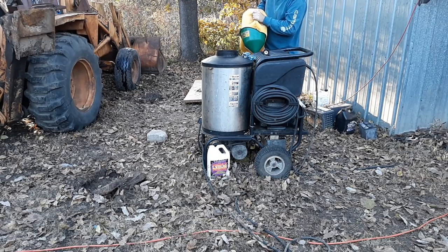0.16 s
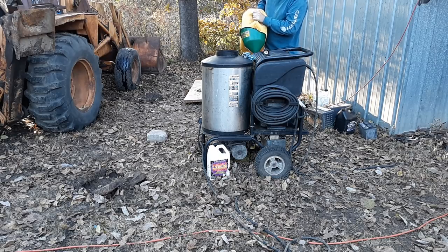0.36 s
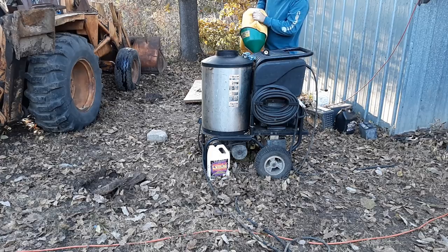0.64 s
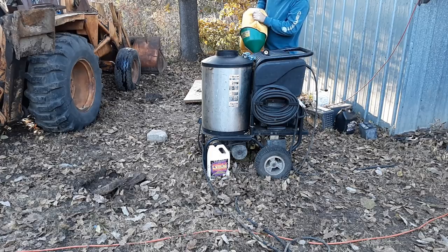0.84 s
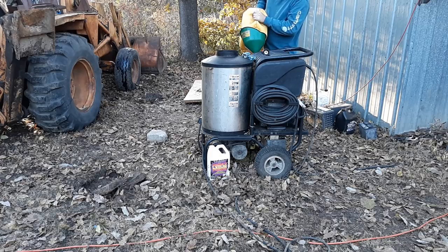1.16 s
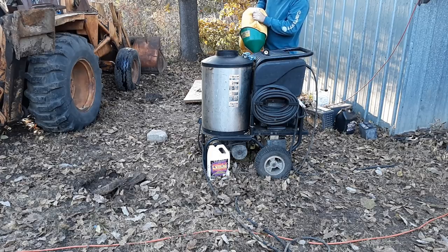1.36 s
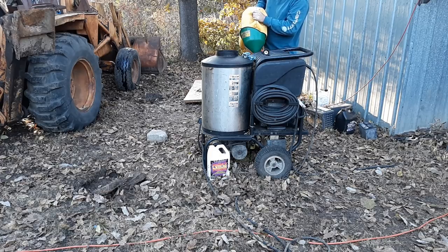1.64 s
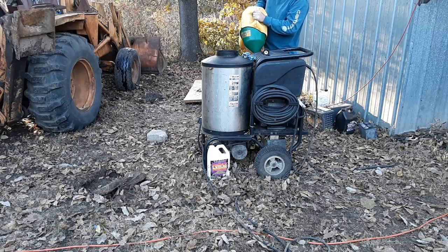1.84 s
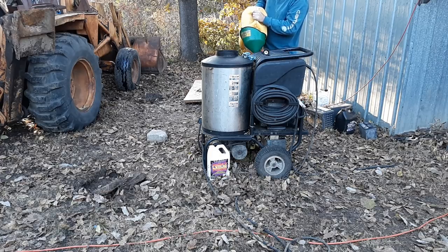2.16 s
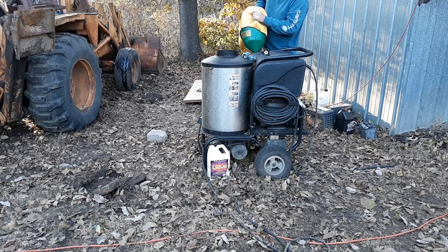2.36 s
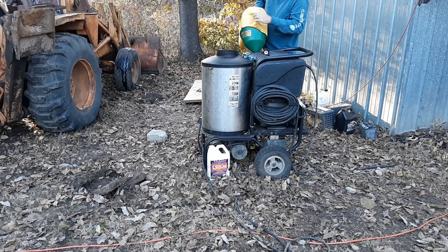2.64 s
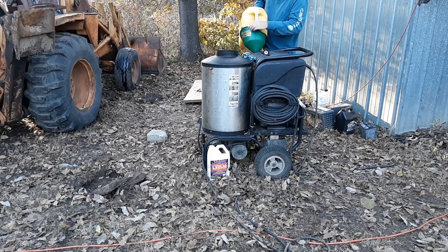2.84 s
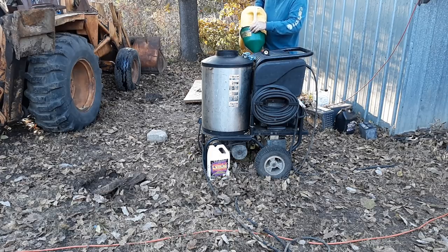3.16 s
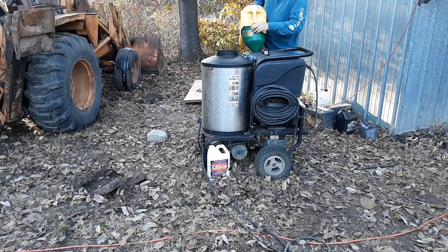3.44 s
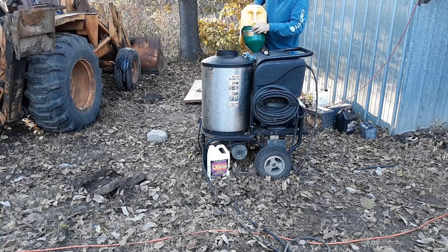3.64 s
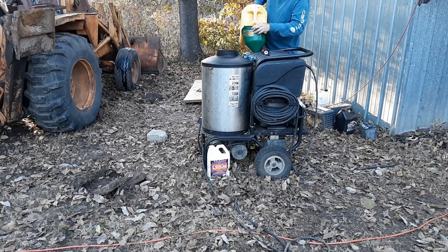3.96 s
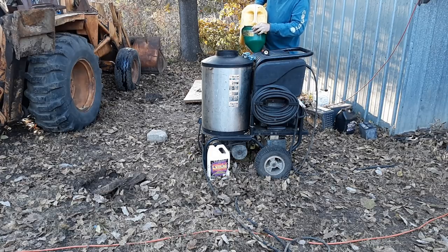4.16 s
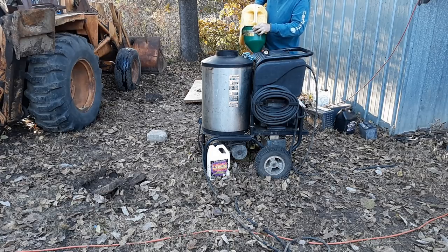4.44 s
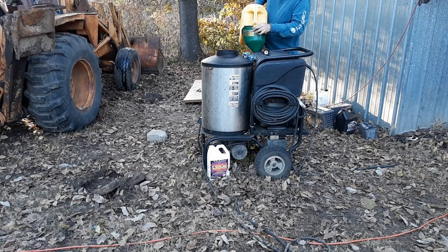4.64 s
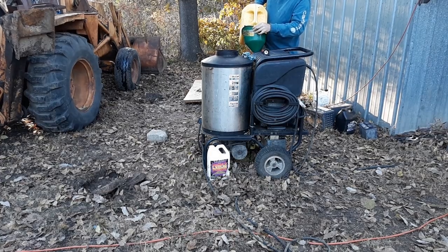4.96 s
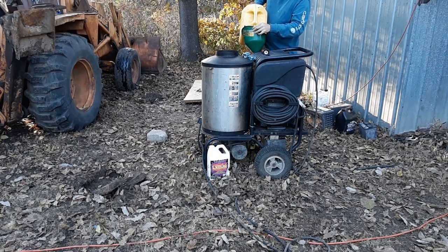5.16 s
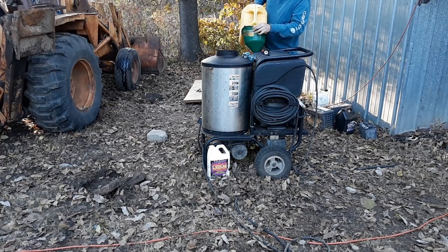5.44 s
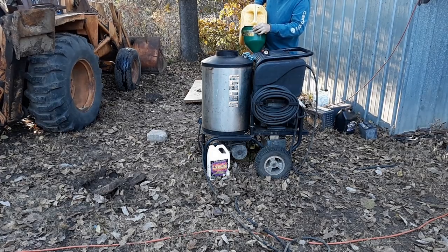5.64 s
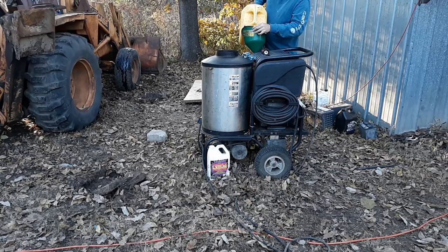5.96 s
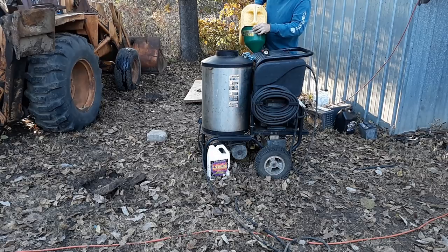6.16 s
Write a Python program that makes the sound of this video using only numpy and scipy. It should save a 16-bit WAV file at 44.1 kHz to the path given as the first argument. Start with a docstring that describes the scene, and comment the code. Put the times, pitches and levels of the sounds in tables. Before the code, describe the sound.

A few metres away in a quiet yard, liquid pours from a plastic jug through a funnel into a machine's tank. Fizzy, pulsing splashes ring the funnel, at first light, then joined by steady hollow glugs several times a second. Around the middle the jug's wall judders and pops; afterwards the glugs are deeper and louder. Occasional ticks, faint low rumble and hiss beneath.

```python
"""Pouring fuel through a funnel

Fuel is poured from a plastic jug through a funnel into a machine's tank, a few metres away in a yard.
The stream is random droplet hits that splash in surges and ring the funnel; bubbles are short rising notes.
Air gulps back into the jug several times a second, each gulp a short hollow glug that rings and rises.
Halfway the jug's wall judders and pops: short pushes set its own notes ringing. Drops tick in the funnel
as short bursts of ringing noise. A faint outdoor rumble and microphone hiss, both shaped noise, lie below."""
import sys
import numpy as np
from scipy import signal
from scipy.fft import rfft, irfft
from scipy.io import wavfile
from scipy.ndimage import map_coordinates

SR = 44100
rng = np.random.default_rng(int(sys.argv[2]) if len(sys.argv) > 2 else 0)


def to_wav(sig):
    """Store sig (one row per channel, or 1-D mono) as 16-bit WAV at the path in sys.argv[1].

    Samples outside -1..1 are clipped; the rate is SR.
    """
    pcm = np.clip(np.atleast_2d(sig), -1, 1) * 32767
    pcm = np.round(pcm).astype(np.int16)
    wavfile.write(sys.argv[1], SR, pcm.T)  # frames by channels


N = 277389

# tone colour of the outdoor rumble: (frequency [Hz], level [dB])
RUMBLE_SPECTRUM = [(20, -45), (40, -12), (65, -0.5), (100, 5), (128, 2), (165, -4.5), (230, -15.5),
                   (400, -26.5), (900, -29)]
# loudness of the outdoor rumble: (time [s], level [dB])
RUMBLE_LEVEL = [(0, -61), (.8, -57.5), (1.6, -54.5), (3, -53), (6.29, -53)]
# tone colour of the steady microphone hiss: (frequency [Hz], level [dB])
HISS_SPECTRUM = [(200, 1.5), (500, 1), (1000, -7.5), (3000, -16.5), (7000, -7), (8500, -29), (15500, -7)]
# drops and ticks on the funnel: (time [s], peak level [dB], pitch [Hz])
FUNNEL_TICKS = [(0.0453, -41.5, 1205), (.046, -37.5, 1600), (.306, -40.5, 4280), (0.427, -41, 3100),
                (1.015, -42, 1200), (2.573, -37, 2290), (2.594, -22.5, 4090), (3.374, -39, 1890),
                (3.727, -36, 3840), (3.801, -42, 3200), (3.964, -37, 6050), (5.34, -23, 5530),
                (5.353, -29, 1570), (5.552, -36, 1570)]
# bends of the jug's wall: (time [s], strength [dB], contact time [s])
WALL_FLEXES = [(3.077, -21, 0.0014), (3.0911, -18.5, 0.0015), (3.1053, -25.5, 0.001), (3.119, -40, 0.0014),
               (3.1321, -20, 0.0011), (3.147, -38, 0.0012), (3.3532, -20, 0.00058), (3.355, -20.5, 0.00024),
               (3.3772, -28.5, 0.00073)]
# the jug wall's own notes: (frequency [Hz], level [dB], time to fall 60 dB [s])
JUG_MODES = [(138, -10, 0.17), (182.5, -16.5, 0.29), (295.6, -3.5, 0.098), (356.8, -5, 0.15),
             (395, -12, 0.19), (577, -4.5, 0.025), (700, -36, 0.035), (980, -9.5, 0.023),
             (1197, 2.5, 0.036), (1724, -2, 0.029), (1900, -25, 0.025), (2530, -4.5, 0.019),
             (4900, -10, 0.011)]
# bubble swarms: (time [s], length [s], peak level [dB], first pitch [Hz], last pitch [Hz])
BUBBLE_SWARMS = [(0.608, 0.045, -40.5, 2400, 2820), (1.044, 0.099, -44, 540, 637),
                 (1.887, .02, -45.5, 820, 615), (3.622, 0.047, -38.5, 2820, 2750),
                 (3.69, 0.034, -41, 1900, 1900), (3.714, 0.16, -33.5, 3080, 3730),
                 (3.794, 0.045, -37, 1400, 1460), (4.258, 0.055, -47.5, 654, 845),
                 (4.408, 0.021, -39.5, 3100, 2500), (4.956, 0.076, -46.5, 730, 1080),
                 (5.204, 0.067, -44, 760, 905), (5.961, 0.18, -42, 2020, 2200),
                 (6.171, 0.09, -47.5, 820, 860)]
# gulps of air into the jug: (time [s], level [dB], pitch [Hz])
AIR_GULPS = [(.112, -47.5, 380), (.228, -48, 474), (.954, -46.5, 417), (1.075, -50, 420), (1.119, -46, 415),
             (1.332, -37.5, 391), (1.542, -38, 417), (1.564, -34, 419), (1.598, -38.5, 395),
             (1.8, -41, 369), (2.012, -40, 405), (2.518, -39, 392), (2.774, -39, 360), (3.012, -33, 393),
             (3.03, -34.5, 356), (3.056, -35.5, 345), (3.187, -42, 340), (3.403, -31, 379),
             (3.558, -43, 353), (3.771, -41, 366), (4.07, -30.5, 371), (4.3, -30.5, 330),
             (4.504, -39.5, 356), (4.551, -30, 344), (4.776, -35.5, 354), (5.019, -37, 360),
             (5.243, -38, 377), (5.273, -39, 393), (5.423, -33, 366), (5.479, -25.5, 367),
             (5.702, -37, 371), (5.937, -26.5, 370), (6.159, -37, 361)]
# air resonances in the funnel, before the tilt below: (frequency [Hz], width [Hz], level [dB])
FUNNEL_MODES = [(1201, 71, 5.5), (1570, 150, 2), (1880, 340, -8), (2820, 45, -14)]
# change of the funnel's colour as it fills: (time [s], gain from each resonance to the next [dB])
FILL_TILT = [(0, 4.5), (1.4, -3), (2.4, -2), (3.5, 1.5), (4.6, 2.5), (6.29, 4)]
# air resonances in the tank's neck, before a fixed tilt: (frequency [Hz], width [Hz], level [dB])
NECK_MODES = [(367.7, 64.5, 18), (510, 810, -3), (506, 22, -1), (820, 390, -58)]
# tone colour of the splashing spray: (frequency [Hz], level [dB])
SPRAY_SPECTRUM = [(1120, -34), (1900, -9), (2550, -6.5), (2780, -3), (3530, -4.5), (4110, 2), (5260, 0),
                  (6870, 4), (7240, 1), (8270, -9), (9200, -8), (11200, -2.5), (15100, -8.5), (15800, -39)]
# low churning of the pool in the funnel, before its trim: (time [s], level [dB])
POOL_CHURN = [(0.0, -58.5), (0.63, -70.5), (0.93, -62), (1.61, -61), (2.07, -61.5), (3.28, -48.5),
              (3.84, -55.5), (4.41, -53.5), (4.85, -66), (5.41, -48), (5.52, -55.5), (6.29, -54)]
# thin stream between surges, before its trims: (time [s], spray level [dB], funnel ring level [dB])
THIN_STREAM = [(0.0, -63, -61), (0.12, -72, -61), (0.23, -58.5, -70.5), (0.47, -61, -63),
               (0.73, -55.5, -62), (1.33, -52.5, -59.5), (1.65, -53, -51.5), (2.26, -51, -57),
               (3.54, -51, -52.5), (3.99, -47.5, -57.5), (4.33, -50.5, -50), (4.57, -51.5, -57),
               (5.13, -48, -58.5), (5.45, -48, -54), (5.71, -51, -58), (6.29, -52, -68.5)]
# surges from the jug: (start [s], length [s], spray level [dB], funnel ring level [dB])
JUG_SURGES = [(0.058, 0.12, -52, -59.5), (0.288, 0.092, -57.5, -86), (.37, 0.064, -51.5, -81),
              (0.549, 0.083, -53.5, -57), (0.598, 0.089, -52.5, -56.5), (0.779, 0.079, -50.5, -54.5),
              (0.928, .03, -64, -49.5), (1.033, .11, -48, -56), (1.267, 0.082, -49.5, -49),
              (1.501, .15, -48.5, -46.5), (1.713, 0.13, -50.5, -50.5), (1.941, 0.12, -46, -54),
              (2.106, .08, -52.5, -55), (2.236, 0.11, -48.5, -55), (2.483, 0.049, -48.5, -42),
              (2.605, 0.084, -53.5, -52), (2.756, 0.11, -49.5, -49), (2.984, 0.15, -53, -46.5),
              (3.267, 0.035, -48, -47.5), (3.339, 0.044, -44, -41), (3.42, 0.095, -51, -51),
              (3.707, 0.15, -47.5, -49), (4.052, 0.027, -48, -50.5), (4.2, 0.18, -49.5, -55),
              (4.404, 0.069, -54, -61), (4.712, 0.16, -49.5, -51.5), (4.98, 0.1, -49.5, -50),
              (5.402, .15, -51.5, -54.5), (5.707, 0.067, -50, -52), (5.931, 0.084, -48.5, -58),
              (6.067, 0.16, -47.5, -51)]
# slugs of liquid slapping into the funnel: (time [s], spray level [dB], time to fall 60 dB [s])
LIQUID_SLAPS = [(0.0446, -48.5, .06), (0.537, -49.5, 0.059), (1.014, -44.5, 0.076), (1.481, -40.5, 0.083),
                (3.237, -42, 0.078), (3.353, -34, .05), (3.9153, -41, 0.02), (4.553, -43, 0.052)]

HISS_DB, CUTOFF_HZ = -61, 15850
LEAN_DB, LAG_SAMPLES = 1.47, 1.29  # the bright sounds lean to the right ear and reach the left later
STREAM_SPRAY_DB, STREAM_RING_DB = -1, 1.5  # trims of the thin stream
SURGE_ATTACK_S, SURGE_RELEASE_S = 0.014, 0.035
POOL_DB, SURGE_CHURN_DB = -1, -4.5  # trim of the pool; churning under a surge, against its funnel ring
TICK_T60_S, TICK_DAMPING = 0.042, 0.96  # ring time at 1 kHz; power of pitch by which it shortens
SPRAY_PATCHY_DB, SPRAY_PATCHES_PER_S = 2, 45  # droplets of like pitch come in bursts
SLAP_RING_DB = -2  # funnel ring under a slap, against its spray
SMALL_GULPS_DB = -13  # against the funnel's ring


def from_db(db):
    """Turn decibels into a gain."""
    return 10 ** (np.asarray(db) / 20)


def rms_one(x):
    """Scale a sound to unit power."""
    return x / np.sqrt(np.mean(x ** 2) + 1e-20)


def in_time(rows):
    """Draw each column of a table as a curve with a value for every sample."""
    s, *columns = np.transpose(rows)
    return [np.interp(np.arange(N) / SR, s, c) for c in columns]


def add(out, s, sound):
    """Mix a sound in at a time in seconds."""
    place = out[int(s * SR):int(s * SR) + len(sound)]
    place += sound[:len(place)]


def drift(rate):
    """Wander slowly at random with spread 1, heading for a new value 'rate' times a second."""
    knots = rng.standard_normal(4000)
    return rms_one(np.interp(np.arange(N) / SR * rate, np.arange(len(knots)), knots))


def coloured(x, points):
    """Filter to a given spectrum without any sound ahead of its cause (minimum phase)."""
    size = 2 ** 19
    hz, db = np.transpose(points)
    grid_hz = np.fft.rfftfreq(size, 1 / SR)
    log_gain = np.log(from_db(np.interp(np.log(grid_hz + 1), np.log(hz), db)))
    cepstrum = irfft(log_gain)[:size // 2]
    response = np.exp(2 * rfft(cepstrum, size) - cepstrum[0])
    return irfft(rfft(x, size) * response)[..., :N]


def low_pass(x, hz):
    """Gently remove the treble (second order)."""
    return signal.sosfilt(signal.butter(2, hz, fs=SR, output="sos"), x + 1e-18)


def below(x, hz):
    """Steeply remove the treble with no phase shift."""
    return signal.fftconvolve(x, signal.firwin(401, hz, fs=SR), "same")


def resonance(x, hz, width):
    """Ring at one pitch, with gain 1 at the top; a narrower width in Hz rings longer."""
    r = np.exp(-np.pi * width / SR)
    forward = np.array([1, 0, -1]) * (1 - r * r) / 2
    feedback = [1, -2 * r * np.cos(2 * np.pi * hz / SR), r * r]
    return signal.lfilter(forward, feedback, x + 1e-18)


def cavity(x, modes, tilt_db, slosh_db):
    """Ring several air resonances side by side; the moving liquid favours now one, now another."""
    total = 0
    for k, (hz, width, db) in enumerate(modes):
        gain = from_db(db + k * tilt_db + slosh_db * drift(25))
        total = total + (-1) ** k * gain * resonance(x, hz, width)  # signs alternate
    return rms_one(total)


def impacts(clumps, per_s, spread_db, clump_db):
    """Droplets land at random as single clicks of many strengths, swelling together in clumps."""
    born = rng.random(N) < per_s / SR
    sizes = from_db(spread_db * np.minimum(rng.exponential(1, N), 4) + clump_db * clumps)
    return born * sizes * rng.choice([-1, 1], N)


def background(spectrum, side_db):
    """Steady noise for outdoor rumble or microphone hiss; 'side_db' sets how much the two ears differ."""
    mid, side = coloured(rng.standard_normal((2, N)), spectrum)
    return rms_one(mid + from_db(side_db) * side * [[1], [-1]])


def ticks(crack, width_share):
    """A drop hits the plastic: a broad crack and a brief ring, shorter for higher pitches."""
    out, t = np.zeros(N), np.arange(SR // 12) / SR
    for s, db, hz in FUNNEL_TICKS:
        t60 = TICK_T60_S * (hz / 1000) ** -TICK_DAMPING
        burst = rng.standard_normal(len(t)) * from_db(-60 * t / t60)
        tick = resonance(burst, hz, hz * width_share) + crack * low_pass(burst, 3400)
        add(out, s, from_db(db) * tick / np.abs(tick).max())
    return out


def jug():
    """The wall buckles in soft jerks, then snaps back; a long contact reaches only the low notes."""
    out, t = np.zeros(N), np.arange(SR // 3) / SR
    body = sum(from_db(db - 60 * t / t60) * np.cos(2 * np.pi * hz * t) for hz, db, t60 in JUG_MODES)
    body *= 1 - np.exp(-t / 0.00099)  # the wall takes a moment to swing
    for s, db, contact_s in WALL_FLEXES:
        push = np.exp(-(2 * t / contact_s - 2) ** 2)
        # start early, so that the push is strongest at the listed time
        add(out, s - contact_s, from_db(db) * signal.fftconvolve(push / push.sum(), body))
    return signal.sosfilt(signal.butter(2, 95, "high", fs=SR, output="sos"), out + 1e-18)


def bubble(hz, cycles, rise):
    """One bubble: a note that climbs in pitch and falls 60 dB in 'cycles' cycles, 50 ms at most."""
    turns = np.arange(SR // 20) / SR * hz
    note = np.sin(2 * np.pi * turns * (1 + rise * turns / cycles))
    return note * from_db(-60 * turns / cycles) * (1 - np.exp(-turns))


def gurgles(scatter, count=14):
    """A swarm of bubbles surfaces one after another, gliding in pitch with some scatter."""
    out = np.zeros(N)
    for s, length, db, first_hz, last_hz in BUBBLE_SWARMS:
        swarm = np.zeros(SR // 4)
        for k, (late, size, strength) in enumerate(rng.random((count, 3))):
            progress = (k + late) / count
            hz = (first_hz + progress * (last_hz - first_hz)) * (1 + scatter * (size - .5))
            add(swarm, progress * length, from_db(15 * strength) * bubble(hz, cycles=19, rise=0.02))
        add(out, s, from_db(db) * swarm / np.abs(swarm).max())
    return out


def burble(per_s, low_hz, octaves, spread_db):
    """Bubbles of many sizes burst at random times in the funnel's pool, each with its own pitch."""
    out = np.zeros(N)
    for when, size, strength in rng.random((int(per_s * N / SR), 3)):
        note = bubble(low_hz * 2 ** (octaves * size), cycles=58, rise=0.074)
        add(out, when * N / SR, from_db(spread_db * strength ** 2) * note)
    return rms_one(out)


def glugs(swell_s, t60, rise, tank_hz, tank_db, slosh_db, slosh_t60):
    """Each gulp of air swells at once and rings out, rising; the tank answers lower, liquid sloshes on."""
    out, t = np.zeros(N), np.arange(SR // 5) / SR
    swell = 1 - np.exp(-(t / swell_s) ** 2)
    shape = swell * from_db(-60 * t / t60)
    slosh_shape = swell * from_db(slosh_db - 60 * t / slosh_t60)
    tank = from_db(tank_db) * np.sin(2 * np.pi * tank_hz * t)
    for s, db, hz in AIR_GULPS:
        note = np.sin(2 * np.pi * hz * t * (1 + rise * t)) - tank
        slosh = rms_one(resonance(rng.standard_normal(len(t)), hz, 53)) * slosh_shape
        add(out, s, from_db(db) * (note * shape / shape.max() + slosh))
    return out


def slaps():
    """Each slug of liquid starts a sudden burst of spray that dies away; as a gain."""
    out, t = np.zeros(N), np.arange(SR // 8) / SR
    for s, db, t60 in LIQUID_SLAPS:
        add(out, s, from_db(db - 60 * t / t60))
    return out


def surges():
    """Each surge swells, holds and drains away; gains of the spray and of the funnel's ring."""
    t, power = np.arange(N) / SR, np.zeros((2, N))
    for s, length, spray_db, ring_db in JUG_SURGES:
        swell = np.clip((t - s) / SURGE_ATTACK_S, 0, 1)
        drain = np.exp(-np.clip((t - s - length) / SURGE_RELEASE_S, 0, 20))
        power += (from_db([[spray_db], [ring_db]]) * swell * drain) ** 2
    return np.sqrt(power)


def flow():
    """Surges and slaps add in power to the thin stream; gains of spray, funnel ring and churning."""
    stream_spray_db, stream_ring_db = in_time(THIN_STREAM)
    pool_db, = in_time(POOL_CHURN)
    surge_spray, surge_ring = surges()
    slap = slaps()
    spray_gain = np.hypot(from_db(stream_spray_db + STREAM_SPRAY_DB), surge_spray)
    ring_gain = np.hypot(from_db(stream_ring_db + STREAM_RING_DB), surge_ring)
    churn_gain = np.hypot(from_db(pool_db + POOL_DB), from_db(SURGE_CHURN_DB) * surge_ring)
    return np.hypot(spray_gain, slap), np.hypot(ring_gain, from_db(SLAP_RING_DB) * slap), churn_gain


def spray(spread_side_db, count=7):
    """The stream breaks into briefly ringing droplets and bubbles over a fine mist; mid and side."""
    pitches = np.geomspace(1900, 8000, 56)
    clumps = drift(70)
    # neighbouring pitches share one of a few burst curves
    bursts = [from_db(SPRAY_PATCHY_DB * drift(SPRAY_PATCHES_PER_S)) for _ in range(count)]
    pair = []
    for side_db in (0, spread_side_db):
        drops = impacts(clumps, per_s=4500, spread_db=4.0, clump_db=1.2)
        dealt = rng.integers(0, len(pitches), N)  # which pitch each drop rings
        fizz = np.zeros(N)
        for k, hz in enumerate(pitches):
            burst = bursts[k * count // len(pitches)]
            fizz += resonance(drops * (dealt == k) * burst, hz, hz * 0.039)
        mist = impacts(clumps, per_s=14000, spread_db=3.0, clump_db=2.26)
        mix = rms_one(fizz) + from_db(3.5) * rms_one(mist)
        pair.append(from_db(side_db) * rms_one(coloured(mix, SPRAY_SPECTRUM)))
    return pair


def yard(x, scatter_db, t60, lag):
    """Direct sound, late on the left by 'lag' samples, and short scatter from machine, ground and shed."""
    t = np.arange(SR // 3) / SR
    scatter = rng.standard_normal((2, len(t))) * from_db(-60 * t / t60) * (t > .002)
    scatter /= np.sqrt(np.sum(scatter ** 2, axis=1, keepdims=True))
    late = map_coordinates(x, [np.arange(N) - lag], order=3)
    echoes = signal.fftconvolve(x[None], scatter, axes=1)[:, :N]
    return np.array([late, x]) + from_db(scatter_db) * echoes


def scene():
    """The pour and the jug in the yard, over the outdoor rumble and the microphone hiss."""
    rumble = from_db(in_time(RUMBLE_LEVEL)[0]) * background(RUMBLE_SPECTRUM, side_db=-14.0)
    hiss = from_db(HISS_DB) * background(HISS_SPECTRUM, side_db=-3)
    spray_gain, ring_gain, churn_gain = flow()
    fill_db, = in_time(FILL_TILT)
    splash, splash_side = spray_gain * spray(spread_side_db=-5.0)
    # the stream drums on the funnel and whips bubbles into it
    drumming = impacts(drift(70), per_s=900, spread_db=1.5, clump_db=2.5)
    funnel = ring_gain * from_db(-5.5) * cavity(drumming, FUNNEL_MODES, tilt_db=fill_db, slosh_db=2.0)
    bubbles = from_db(-12.5) * burble(per_s=130, low_hz=1071, octaves=1.02, spread_db=12)
    small_gulps = from_db(SMALL_GULPS_DB) * burble(per_s=30, low_hz=360, octaves=0.647, spread_db=13.5)
    # it plunges into the pool above the neck
    plunging = impacts(drift(70), per_s=500, spread_db=0.5, clump_db=0.0)
    churn = churn_gain * cavity(plunging, NECK_MODES, tilt_db=-10, slosh_db=4.0)
    gulps = glugs(swell_s=0.0017, t60=0.073, rise=0.66, tank_hz=291, tank_db=-16,
                  slosh_db=-16.5, slosh_t60=0.3)
    bright = funnel + ring_gain * (bubbles + small_gulps)
    bright += gurgles(scatter=0.2) + ticks(crack=0.0083, width_share=0.056)
    pour = yard(bright, scatter_db=-4, t60=0.15, lag=LAG_SAMPLES)
    pour += yard(splash, scatter_db=-12.5, t60=0.056, lag=LAG_SAMPLES) + splash_side * [[1], [-1]]
    hollow = yard(churn + gulps + jug(), scatter_db=-15.5, t60=0.18, lag=2.5)
    # everything but the hiss is a little louder on the right
    pour_lean = from_db(LEAN_DB * np.array([[-.5], [.5]]))
    low_lean = from_db([[-.3], [.3]])
    return pour * pour_lean + (hollow + rumble) * low_lean + hiss


def record(dry):
    """The stereo image narrows in the high treble and the top is cut."""
    mid, side = (dry[0] + dry[1]) / 2, (dry[0] - dry[1]) / 2
    side = .18 * side + .82 * below(side, 9500)
    return np.array([below(mid + side, CUTOFF_HZ), below(mid - side, CUTOFF_HZ)])


dry = scene()
out = record(dry)
to_wav(out)
```